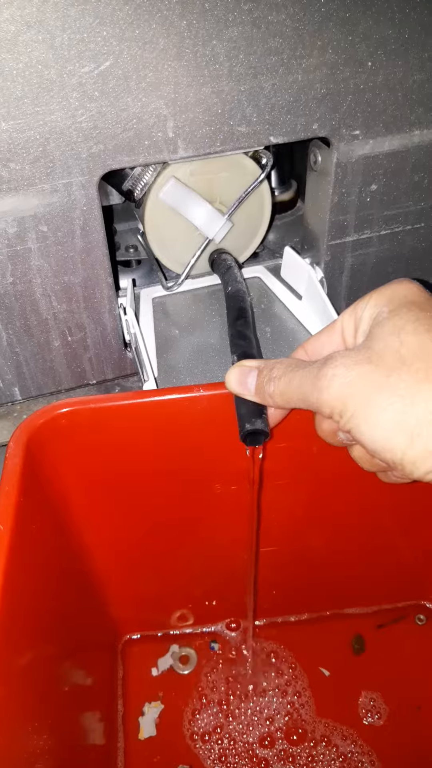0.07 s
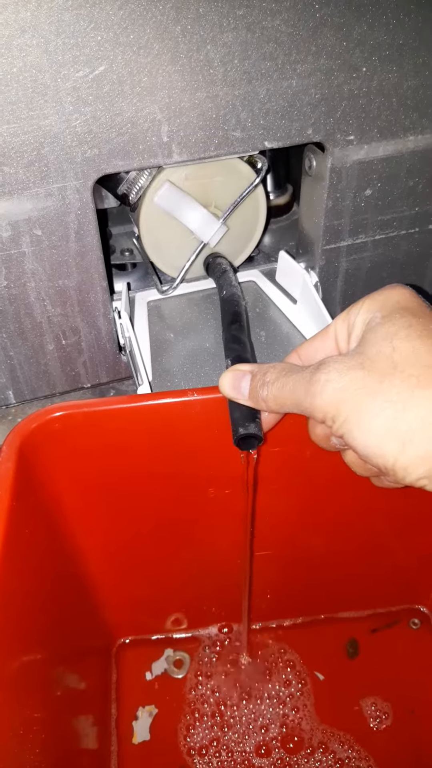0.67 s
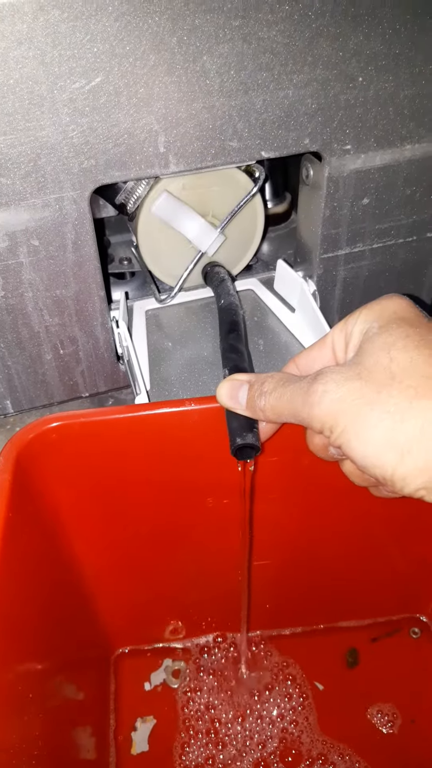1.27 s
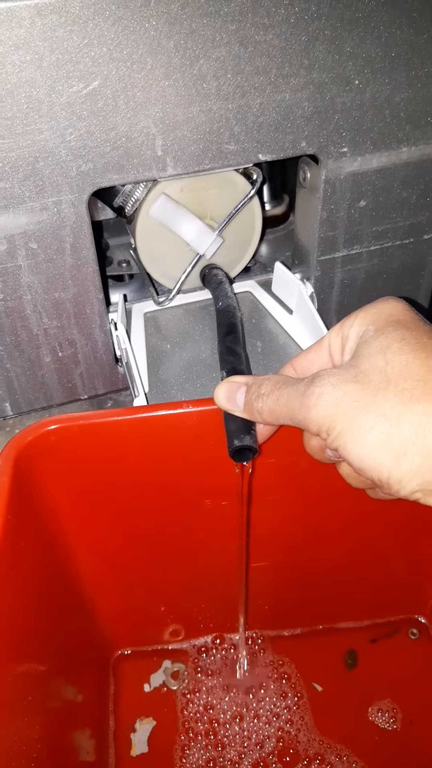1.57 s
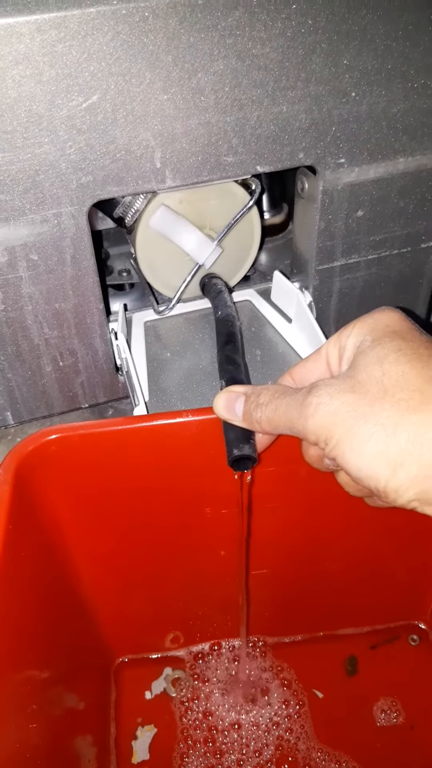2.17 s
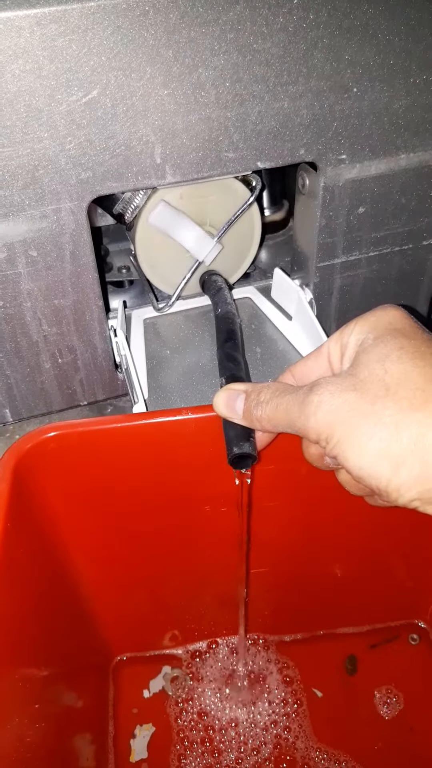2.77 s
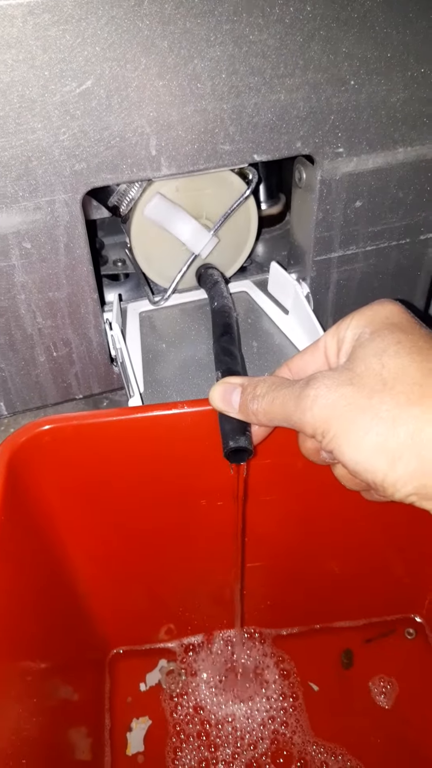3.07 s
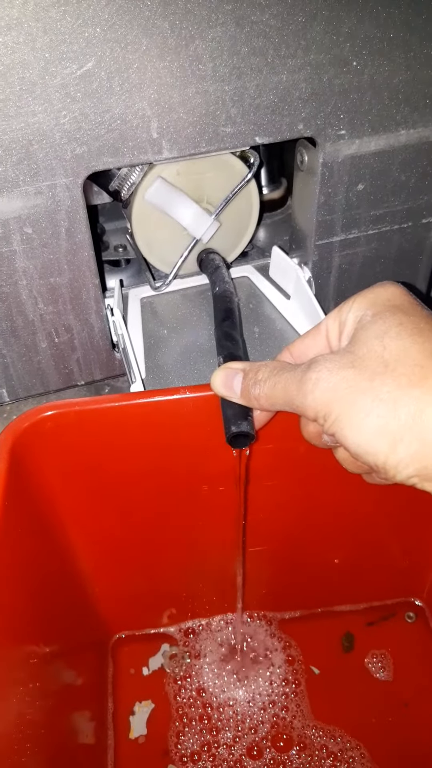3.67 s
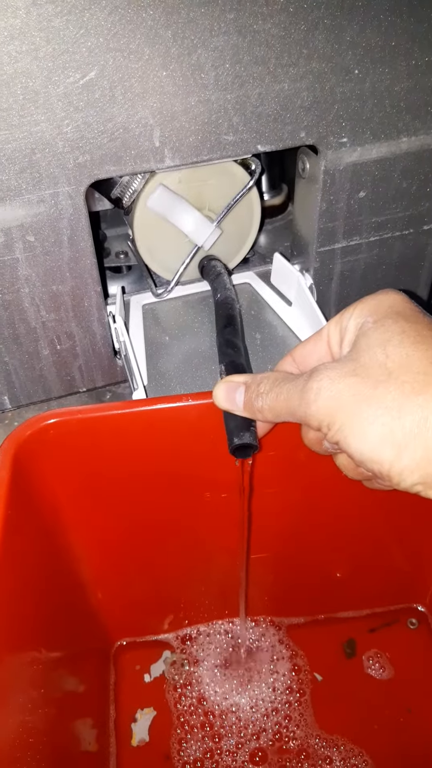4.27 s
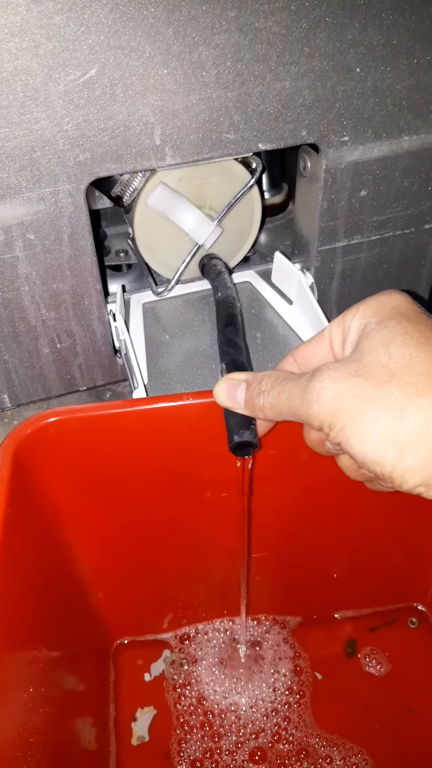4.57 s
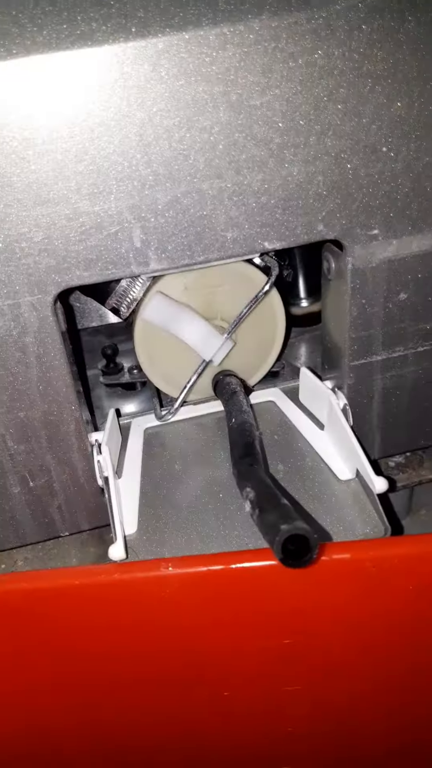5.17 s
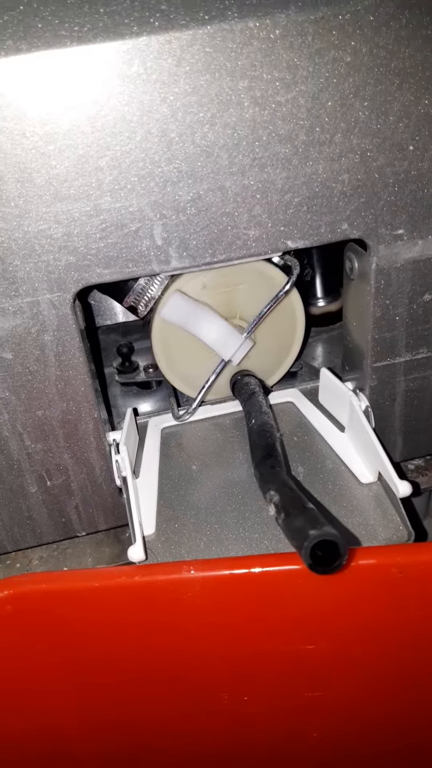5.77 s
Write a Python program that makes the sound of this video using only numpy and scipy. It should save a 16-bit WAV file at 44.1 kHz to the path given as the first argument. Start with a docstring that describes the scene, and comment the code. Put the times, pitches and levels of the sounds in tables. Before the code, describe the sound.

A thin stream of water runs from a washing machine's drain hose into a plastic basin, drumming dully on the bottom with small splashes and tiny bubble plinks. A low hum, room rumble and faint hiss lie underneath. After about five seconds the water cuts off with a short click and the hum drops. Two strong, dull knocks and a few lighter bumps then thud close to the microphone.

```python
"""A thin stream of water falls from a washing machine's drain hose into a plastic basin.
Its drops drum on the basin floor, splash in the shallow water and trap small bubbles that plink.
A low hum, room rumble and faint hiss lie underneath; the whole sound is very dull.
At five seconds the scene cuts abruptly with a short click: the water is gone, and hum and hiss drop.
A few knocks and bumps then thud close to the microphone."""
import sys
import numpy as np
from scipy import signal
from scipy.fft import rfft, irfft, next_fast_len
from scipy.io import wavfile

SR = 44100
rng = np.random.default_rng(int(sys.argv[2]) if len(sys.argv) > 2 else 0)


def transcribe(signal):
    """Save signal, clipped to [-1, 1], as a 16-bit WAV file at the path in sys.argv[1]."""
    frames = np.atleast_2d(signal).T
    limited = np.clip(frames, -1, 1)
    pcm = np.round(limited * 32767).astype(np.int16)
    wavfile.write(sys.argv[1], SR, pcm)


N = 266055
TIME = np.arange(N) / SR
CUT_S = 4.997


def amp(db):
    return 10 ** (np.asarray(db) / 20)


def unit_rms(x):
    return x / np.sqrt(np.mean(x ** 2) + 1e-20)


def level_db(spectrum, hz):
    points_hz, points_db = np.transpose(spectrum)
    return np.interp(np.log(hz + 1), np.log(points_hz + 1), points_db)


def add(mix, start_s, sound):
    part = mix[max(round(start_s * SR), 0):][:len(sound)]
    part += sound[:len(part)]


def step_at_cut(before, after):
    """Step between two values in 10 ms at CUT_S."""
    return np.interp(TIME, [CUT_S, CUT_S + .01], [before, after])


def response(db_at, size=8192):
    """Minimum-phase impulse response of gain db_at(hz), end tapered."""
    hz = abs(np.fft.fftfreq(size, 1 / SR))
    log_gain = np.log(amp(db_at(hz)) + 1e-6)
    taps = np.fft.ifft(np.exp(np.conj(signal.hilbert(log_gain)))).real
    return taps[:size // 2] * signal.windows.tukey(size, .5)[size // 2:]


def colour(x, spectrum):
    """Filter x by a spectrum; unit rms out."""
    taps = response(lambda hz: level_db(spectrum, hz))
    return unit_rms(signal.oaconvolve(x, taps)[:N])


def wander(rate_hz):
    """Smooth low-passed noise, unit rms."""
    size = next_fast_len(N)
    lowpass = np.exp(-(np.fft.rfftfreq(size, 1 / SR) / rate_hz) ** 2)
    return unit_rms(irfft(rfft(rng.standard_normal(size)) * lowpass, size)[:N])


def reverb(x, t60_s, wet_db):
    """Add a diffuse tail: each band's power decays with random phase."""
    frame, hop = 256, 64
    bands = signal.stft(x, nperseg=frame, noverlap=frame - hop)[2]
    decay = amp(-60 * hop / SR / t60_s) ** 2
    power = signal.lfilter([0, 0, 1 - decay], [1, -decay], abs(bands) ** 2)
    phasors = np.exp(2j * np.pi * rng.random(bands.shape))
    tail = signal.istft(np.sqrt(power) * phasors, nperseg=frame, noverlap=frame - hop)[1][:N]
    return x + amp(wet_db) * np.std(x) * unit_rms(tail)


def impacts(per_s, spread_db):
    """Drop impacts as random impulses; spread_db makes a few larger."""
    size = amp(spread_db * np.minimum(rng.exponential(1, N), 4))
    return size * rng.choice([-1, 1], N) * (rng.random(N) < per_s / SR)


def bubble(hz, decay_cycles, rise, onset_cycles):
    """An air pocket rings briefly, its pitch climbing as it nears the surface."""
    cycles = np.arange(int(6 * decay_cycles / hz * SR)) * hz / SR
    phase = 2 * np.pi * cycles * (1 + rise * cycles / decay_cycles)
    onset = 1 - np.exp(-(cycles / onset_cycles) ** 2)
    ring = np.sin(phase) * onset * np.exp(-cycles / decay_cycles)
    return ring / abs(ring).max()


def swarm(low_hz, high_hz, per_s, spread_db, **shape):
    """Bubbles at random times and pitches, most faint."""
    out = np.zeros(N)
    for when, pitch, chance in rng.random((int(per_s * N / SR), 3)):
        db = spread_db * min(-np.log(1 - chance), 4)
        hz = low_hz * (high_hz / low_hz) ** pitch
        add(out, when * N / SR, amp(db) * bubble(hz, **shape))
    return out


# Room rumble spectrum: f/Hz, relative level/dB
RUMBLE_SPECTRUM = [(15, -39.5), (25, -13), (32, -23), (43, -10), (65, -3), (74, -7), (81, -13.5),
                   (140, -16), (175, -15), (257, -20), (338, -23), (377, -31), (2000, -71), (2600, -105),
                   (4400, -120)]
# Microphone hiss spectrum: f/Hz, relative level/dB
HISS_SPECTRUM = [(800, -31), (1600, 0.5), (2500, -2), (3200, -2), (4050, -1.5), (5000, -6), (6500, -12.5),
                 (8500, -17.5), (11000, -9.5), (14000, -6.5), (16000, -4.5)]


def background():
    """Room rumble and microphone hiss."""
    rumble = amp(-40) * colour(rng.standard_normal(N), RUMBLE_SPECTRUM)
    hiss = amp(step_at_cut(-73.5, -78)) * colour(rng.standard_normal(N), HISS_SPECTRUM)
    return rumble + hiss


# Hum tones: f/Hz, level before cut/dB, level after cut/dB, waver depth, waver rate/Hz
HUM_TONES = [(41.6, -50, -50, 0.8, 7.1), (59.4, -37.5, -44, .6, 3.8), (333.4, -41, -51.5, 0.34, 9),
             (993, -69, -91, 1, 21)]


def hum():
    """A deep drone wavering in level and pitch, quieter after the cut."""
    out = np.zeros(N)
    for hz, before_db, after_db, depth, rate_hz in HUM_TONES:
        waver = 1 + depth * (wander(rate_hz) + 1j * wander(rate_hz))
        tone = unit_rms((waver * np.exp(2j * np.pi * hz * TIME)).real)
        out += amp(step_at_cut(before_db, after_db)) * tone
    return out


# Ticks: t/s, peak level/dB, centre f/Hz, half-width/octaves
TICKS = [(4.997, -37.5, 2180, 1.1), (5.0375, -42.5, 1050, 0.22), (5.1531, -48.5, 3860, 0.16),
         (5.153, -55, 1100, 0.5)]


def ticks():
    """Light, sharp ticks, each a band-passed impulse."""
    out = np.zeros(N)
    for start_s, db, centre_hz, octaves in TICKS:
        tick = response(lambda hz: -20 * np.log10(1 + (np.log2((hz + 1) / centre_hz) / octaves) ** 2))
        add(out, start_s, amp(db) * tick / abs(tick).max())
    return reverb(out, t60_s=.3, wet_db=-8.5)


# Dead-blow spectrum: f/Hz, relative level/dB
THUD_SPECTRUM = [(15, -24), (30, -10.5), (50, 5), (70, 6.5), (115, 1.5), (170, -4), (380, -12), (600, -22),
                 (850, -33), (1100, -41.5), (1400, -58), (2500, -59.5), (6000, -62.5), (16000, -71.5)]
# Knocks and bumps: t/s, peak level/dB, contact low-pass f/Hz, high-pass f/Hz
KNOCKS = [(3.126, -17.5, 346, 119.3), (5.0123, -4.5, 166, 47.3), (5.036, -6.5, 150, 55),
          (5.1814, -15.5, 520, 110), (5.2346, -23.5, 400, 54.7), (5.311, -30.5, 1400, 220),
          (5.344, -28, 1000, 55), (5.4062, -.7, 740, 43.2), (5.471, -36.5, 1500, 300), (5.82, -27, 120, 45),
          (6.022, -25, 1200, 72)]


def knocks(bending_hz=700):
    """Dead blows: soft contact rounds off the treble; slow bending waves bring the bass last."""
    out = np.zeros(N)
    pole = np.exp(-2 * np.pi * bending_hz / SR)
    for start_s, db, contact_hz, low_hz in KNOCKS:
        def blow_db(hz):
            loss = (1 + (hz / contact_hz) ** 4) * (1 + (low_hz / (hz + 1)) ** 4)
            return level_db(THUD_SPECTRUM, hz) - 10 * np.log10(loss)
        thud = signal.lfilter([-pole, 1], [1, -pole], response(blow_db))  # all-pass dispersion
        add(out, start_s, amp(db) * thud / abs(thud).max())
    return reverb(out, t60_s=.16, wet_db=-31)


# Loudest bubbles: t/s, relative level/dB, f/Hz
PLINKS = [(0.0638, -51.5, 2630), (0.171, -42.5, 3990), (0.3293, -46.5, 3710), (0.38, -48, 3850),
          (0.4449, -50, 3040), (0.5075, -40.5, 4190), (0.7384, -54.5, 3530), (0.7771, -52, 2520),
          (0.8165, -50, 3960), (1.027, -50, 4060), (1.0437, -50, 2560), (1.0872, -50, 2850),
          (1.154, -48.5, 3830), (1.1697, -50, 3530), (1.1966, -44.5, 3950), (1.454, -49.5, 4140),
          (1.5041, -50, 4370), (1.6827, -51.5, 4020), (1.833, -53.5, 3940), (1.8655, -49, 3870),
          (2.217, -52, 4100), (2.7417, -52, 3330), (2.8789, -50.5, 3860), (2.9123, -47.5, 3750),
          (2.9378, -36.5, 3910), (3.5488, -50.5, 3370), (3.5854, -59.5, 3510), (4.2497, -52, 3450),
          (4.7683, -53, 4490)]
# Tiny-bubble spectrum: f/Hz, relative level/dB
FIZZ_SPECTRUM = [(1800, -18.5), (2250, -14.5), (2600, -5.5), (2850, -10.5), (3400, -0.5), (3750, -2),
                 (4030, 7), (4300, -9), (4600, 2.5), (5000, -13), (6500, -17), (9000, -41.5),
                 (16000, -41.5)]


def bubbling(plink_db=-1.3, shard_db=-10.5, spray_db=-26.5, fizz_db=-74.5):
    """Tiny bubbles crackle in the stream; each gulp of air plinks and splits up in a brief spray."""
    shape = dict(decay_cycles=4.8, rise=.004, onset_cycles=4)
    spray_rise_s, spray_fall_s = .011, .043
    plinks, spray = np.zeros(N), np.zeros(N)
    for start_s, db, hz in PLINKS:
        add(plinks, start_s, amp(db + plink_db) * bubble(hz, **shape))
        for lag_s, octaves in zip(rng.exponential(.005, 3), rng.uniform(-.35, .35, 3)):
            shard_hz = min(hz * 2 ** octaves, 4500)
            add(plinks, start_s + lag_s, amp(db + shard_db) * bubble(shard_hz, **shape))
        tau_s = np.where(TIME < start_s, spray_rise_s, spray_fall_s)
        spray += amp(db + spray_db) * np.exp(-abs(TIME - start_s) / tau_s)
    steady = step_at_cut(amp(fizz_db), 0)
    tiny = swarm(1960, 7160, per_s=420, spread_db=4, decay_cycles=3.5, rise=.012, onset_cycles=.8)
    fizz = np.hypot(steady, spray) * colour(tiny, FIZZ_SPECTRUM)
    return reverb(fizz, t60_s=.13, wet_db=-3.5) + reverb(plinks, t60_s=.31, wet_db=-11)


def gurgle(start_s=1.29, length_s=.11, db=-47, from_hz=580, to_hz=720, scatter_octaves=.2, count=8):
    """Uneven air pockets break off in a run, tending smaller and higher."""
    out = np.zeros(N)
    progress = (np.arange(count) + rng.random(count)) / count
    for part, scatter in zip(progress, rng.standard_normal(count)):
        hz = from_hz * (to_hz / from_hz) ** part * 2 ** (scatter_octaves * scatter)
        pocket = bubble(hz, decay_cycles=8.3, rise=.015, onset_cycles=1.8)
        add(out, start_s + part * length_s, amp(db) * pocket)
    return out


# Stream strength: t/s, relative drum level/dB, relative splash level/dB
FLOW = [(0.02, -35, -52.5), (0.32, -35, -50), (0.83, -35, -52), (0.94, -31.5, -53), (0.98, -31.5, -47.5),
        (1.11, -37, -56), (1.23, -34.5, -46.5), (1.67, -35.5, -56), (2.81, -34, -56), (3.05, -34.5, -49.5),
        (3.09, -41.5, -54.5), (3.13, -30, -48.5), (3.2, -31.5, -59.5), (3.64, -34.5, -54.5),
        (3.97, -35.5, -52.5), (4.17, -33, -52.5), (4.24, -34, -53), (4.96, -35, -59)]


def flow(part):
    """Gain of "drum" or "splash" as the stream wanders over the basin floor; zero after the cut."""
    times_s, drum_db, splash_db = np.transpose(FLOW)
    db = {"drum": drum_db, "splash": splash_db}[part]
    return amp(np.interp(TIME, times_s, db)) * step_at_cut(.97, 0)


# Splash spectrum: f/Hz, relative level/dB
SPLASH_SPECTRUM = [(200, -17.5), (450, 2), (720, 5), (950, -10), (1250, -8.5), (1550, -20), (1750, -26.5),
                   (2300, -39.5), (4200, -41.5), (5500, -48), (9000, -57.5)]
# Fat drops: t/s, peak level/dB, f/Hz
FAT_DROPS = [(.044, -41.5, 900), (.064, -41.5, 1093), (.269, -37, 740), (.304, -38, 893), (.531, -37, 1146),
             (.733, -45, 1020), (.976, -35.5, 848), (1.232, -35.5, 800), (1.59, -39.5, 966),
             (3.021, -43, 924), (3.186, -40.5, 617), (4.57, -40, 900)]


def splashing(patter_db=-3.5, pockets_db=-7.5):
    """Drops patter on the water and trap gurgling air; now and then a fat one slaps down."""
    patter = amp(patter_db) * colour(impacts(per_s=250, spread_db=3), SPLASH_SPECTRUM)
    pockets = swarm(433.6, 1420, per_s=61, spread_db=4, decay_cycles=4.5, rise=.026, onset_cycles=.82)
    splash = flow("splash") * (patter + amp(pockets_db) * colour(pockets, SPLASH_SPECTRUM))
    for start_s, db, hz in FAT_DROPS:
        add(splash, start_s, amp(db) * bubble(hz, decay_cycles=1.35, rise=.012, onset_cycles=.6))
    return reverb(splash + gurgle(), t60_s=.23, wet_db=-4)


# Wet basin floor spectrum: f/Hz, relative level/dB
FLOOR_SPECTRUM = [(18, -40.5), (30, -21), (43, -11.5), (65, -4.5), (85, 2), (114, 0), (145, -5),
                  (224, -3.5), (265, -7.5), (332, -13), (400, -15), (520, -23), (770, -27.5), (1000, -46.5),
                  (2200, -54), (4000, -100)]
# Basin modes: f/Hz, relative level/dB, t60/s
BASIN_MODES = [(121.5, -9, 0.22), (174.65, -12, 0.7), (221.2, -12.5, 0.19), (286.9, -12.5, 0.51),
               (380, -34, 0.14), (780, -35, 0.098), (1676, -43, 0.074)]


def drumming(gain_db=-2):
    """The stream breaks into drops that beat the plastic floor through a thin layer of water."""
    kicks = impacts(per_s=520, spread_db=0)
    floor = colour(kicks, FLOOR_SPECTRUM)
    age_s = np.arange(SR // 2) / SR
    for hz, db, t60_s in BASIN_MODES:
        ring = amp(-60 * age_s / t60_s) * np.sin(2 * np.pi * hz * age_s)
        floor += amp(db) * unit_rms(signal.oaconvolve(kicks, ring)[:N])
    return amp(gain_db) * flow("drum") * floor


def scene():
    stream = drumming() + splashing() + bubbling()
    return (stream + knocks() + ticks() + hum() + background())[None]


def record(dry):
    """Low-pass at 15.75 kHz."""
    lowpass = signal.firwin(511, 15750, window=("kaiser", 9), fs=SR)
    return signal.oaconvolve(dry, lowpass[None], "same")


dry = scene()
out = record(dry)
transcribe(out)
```